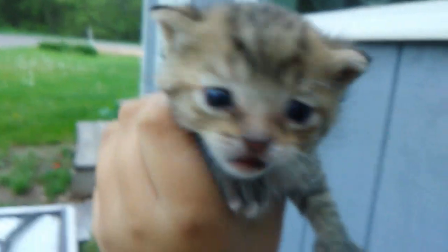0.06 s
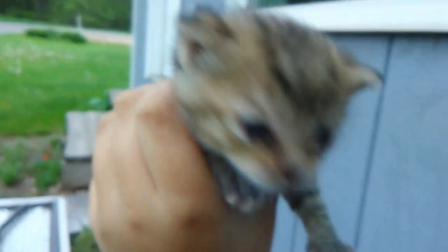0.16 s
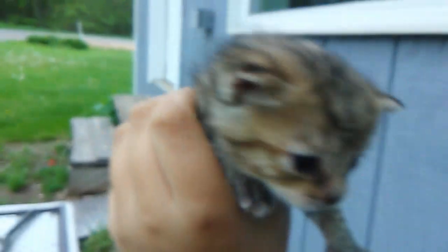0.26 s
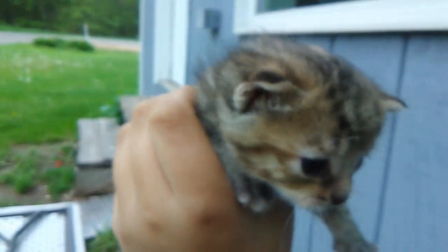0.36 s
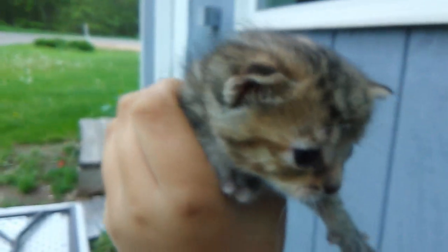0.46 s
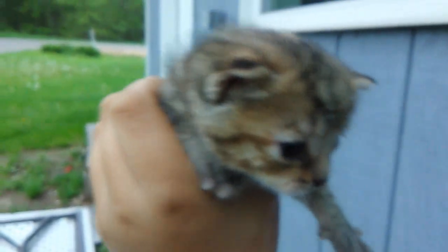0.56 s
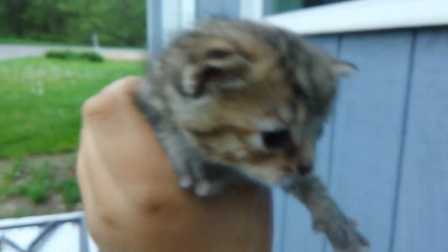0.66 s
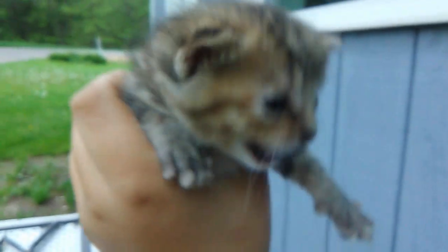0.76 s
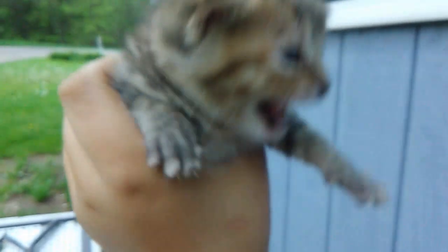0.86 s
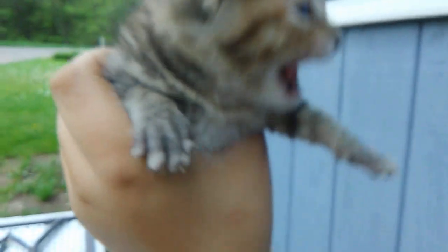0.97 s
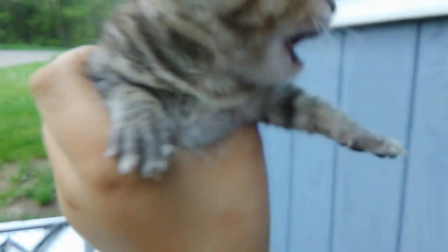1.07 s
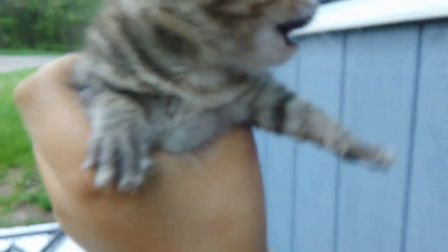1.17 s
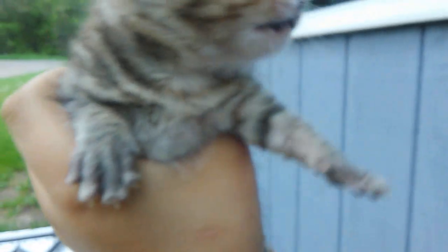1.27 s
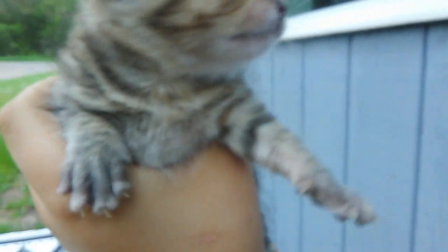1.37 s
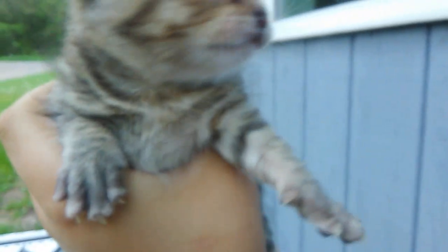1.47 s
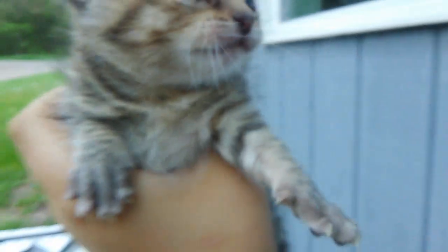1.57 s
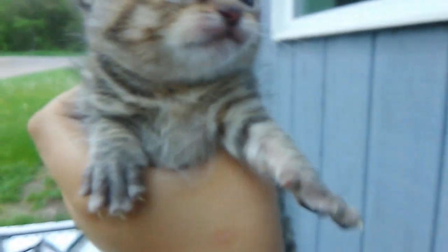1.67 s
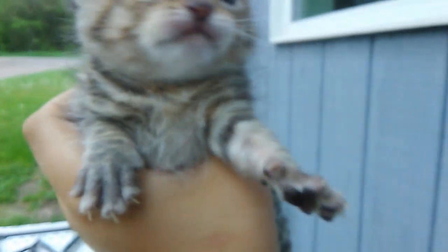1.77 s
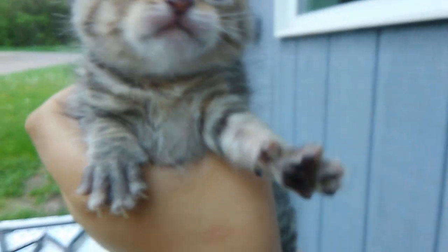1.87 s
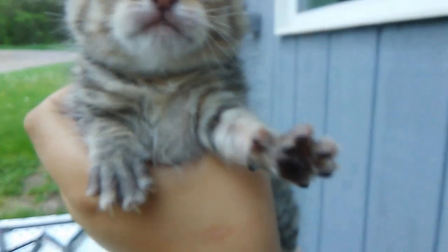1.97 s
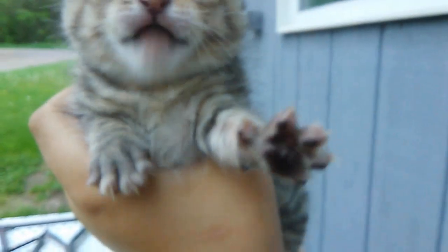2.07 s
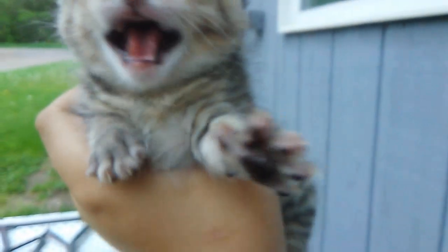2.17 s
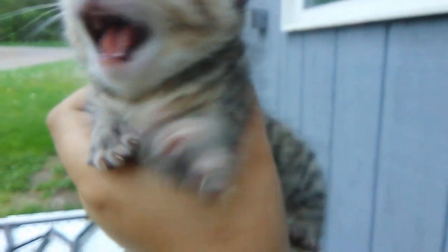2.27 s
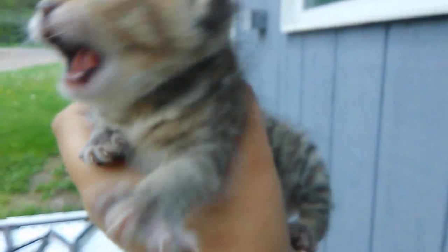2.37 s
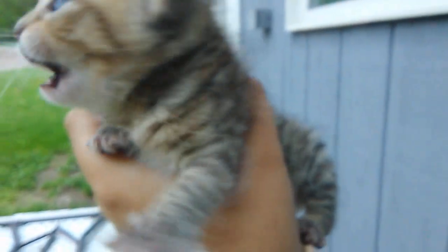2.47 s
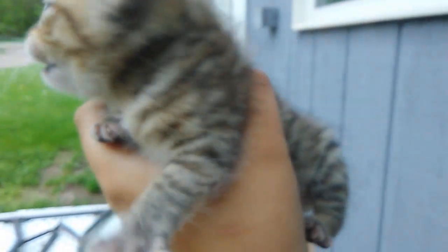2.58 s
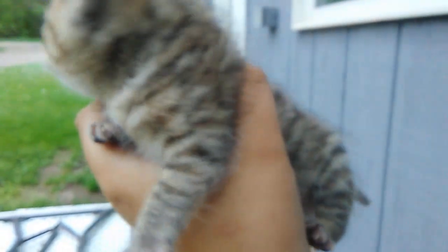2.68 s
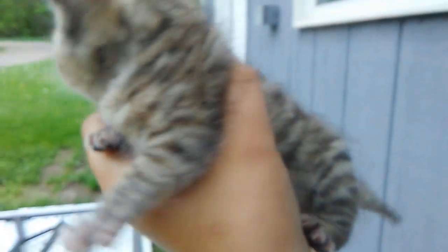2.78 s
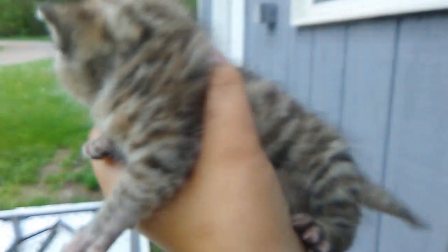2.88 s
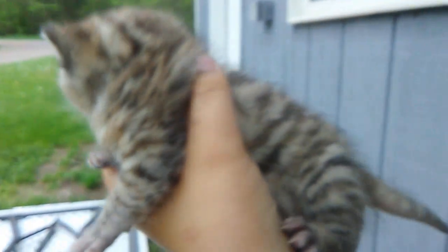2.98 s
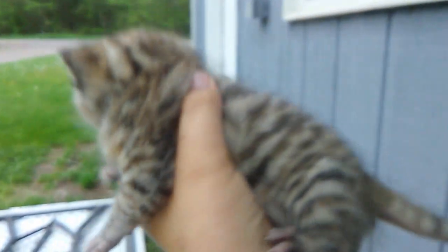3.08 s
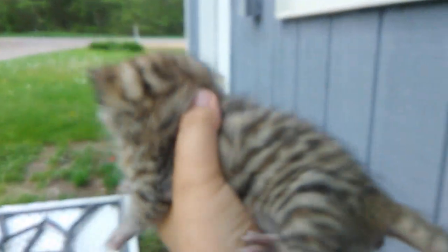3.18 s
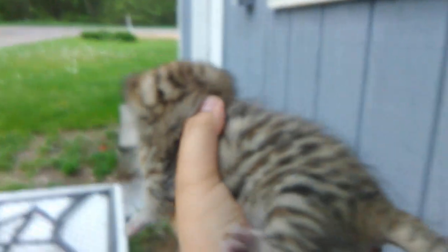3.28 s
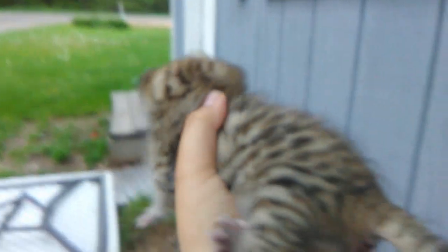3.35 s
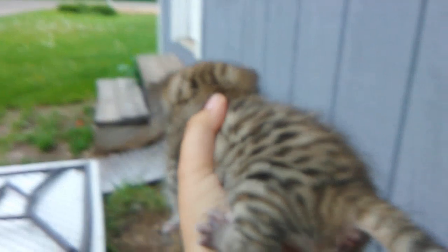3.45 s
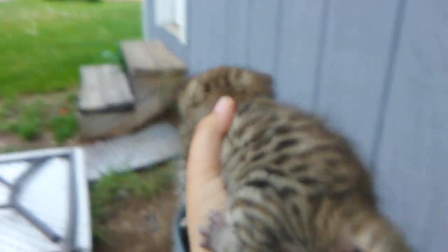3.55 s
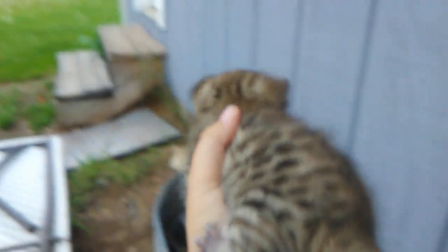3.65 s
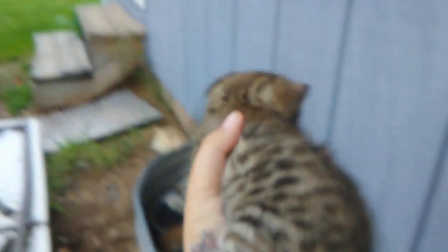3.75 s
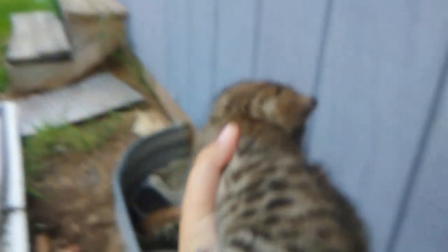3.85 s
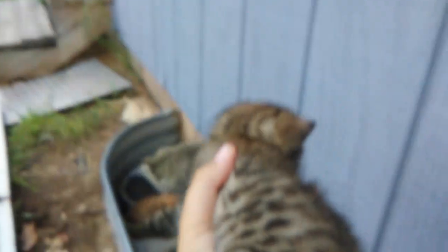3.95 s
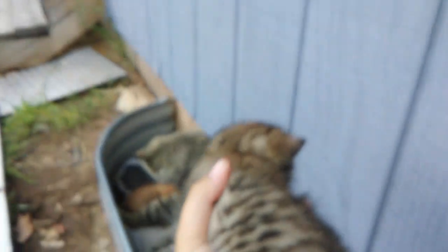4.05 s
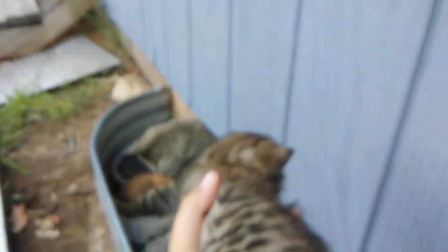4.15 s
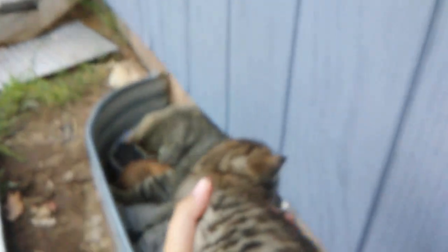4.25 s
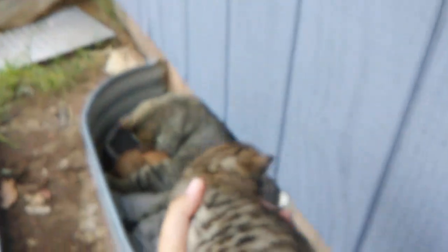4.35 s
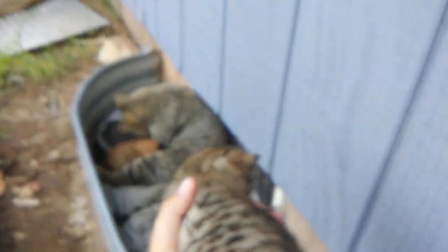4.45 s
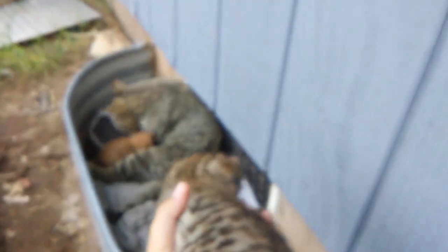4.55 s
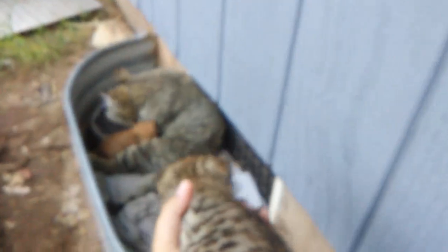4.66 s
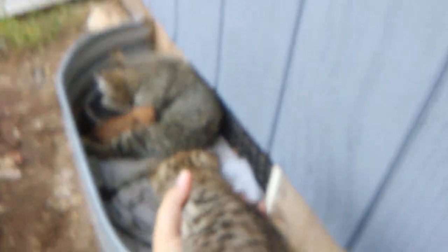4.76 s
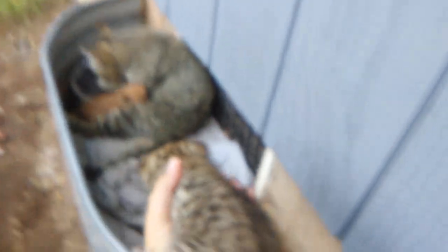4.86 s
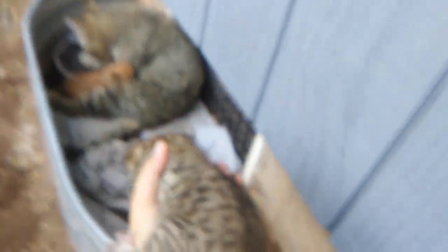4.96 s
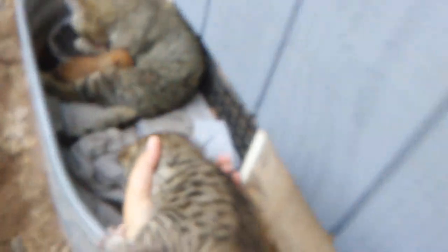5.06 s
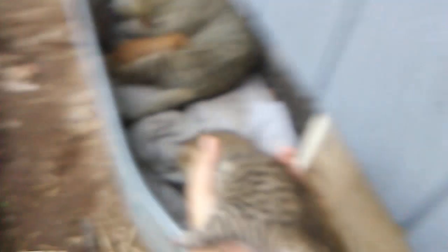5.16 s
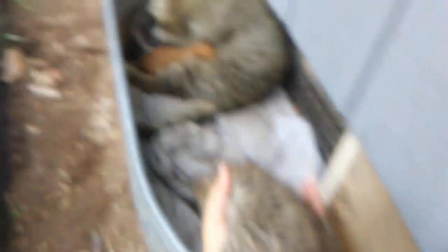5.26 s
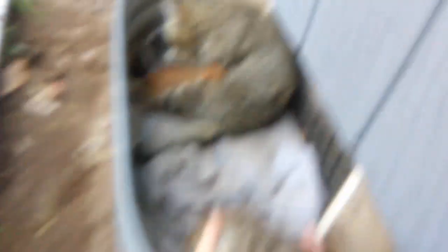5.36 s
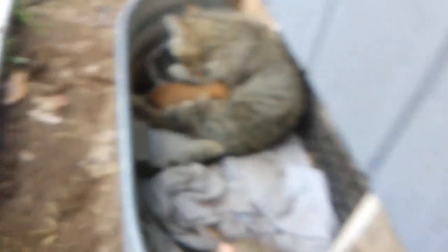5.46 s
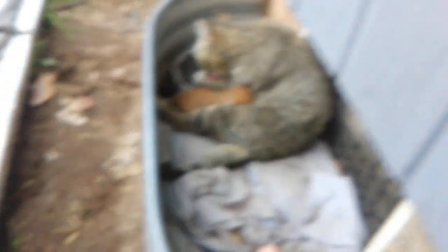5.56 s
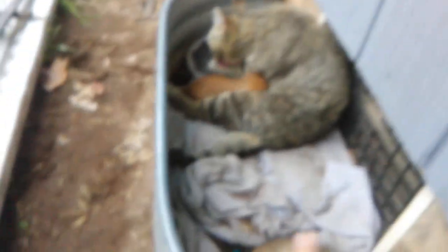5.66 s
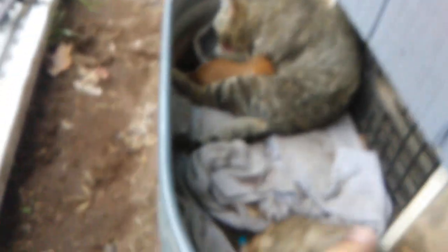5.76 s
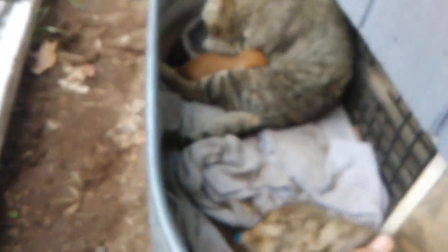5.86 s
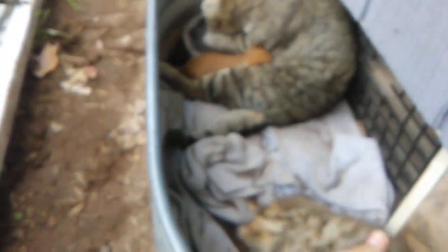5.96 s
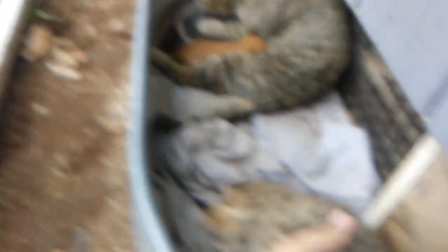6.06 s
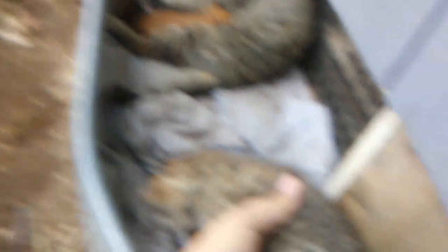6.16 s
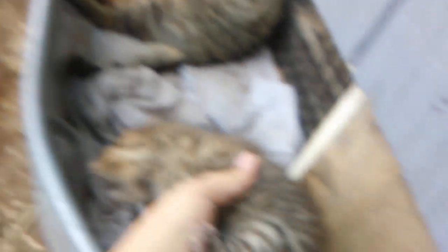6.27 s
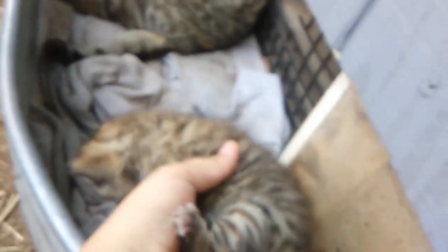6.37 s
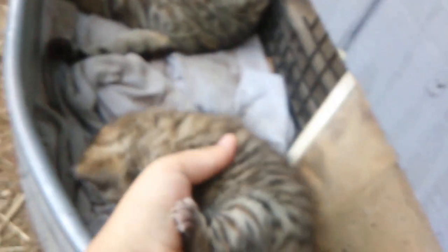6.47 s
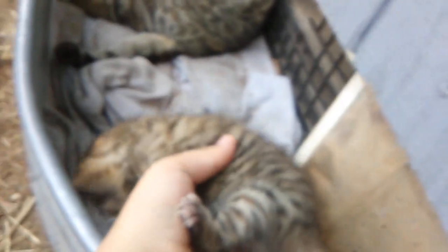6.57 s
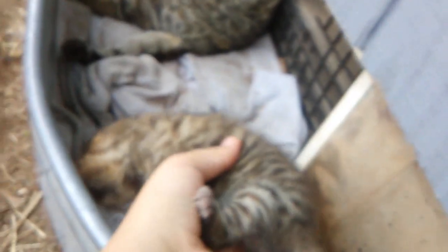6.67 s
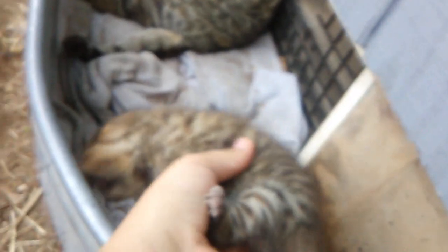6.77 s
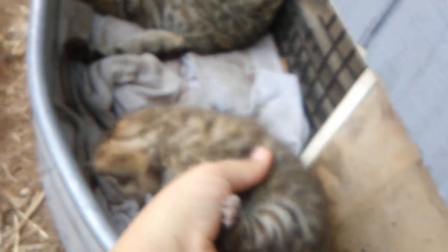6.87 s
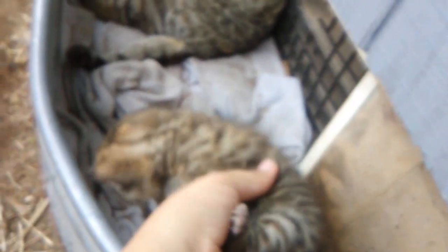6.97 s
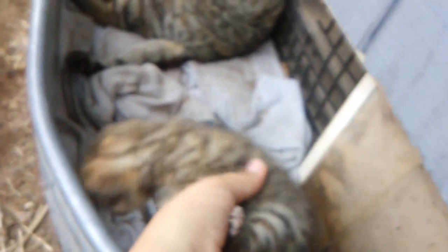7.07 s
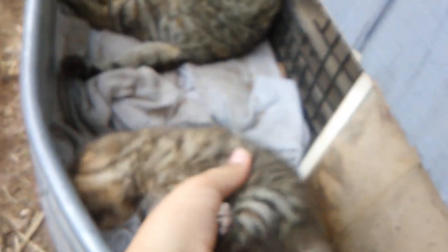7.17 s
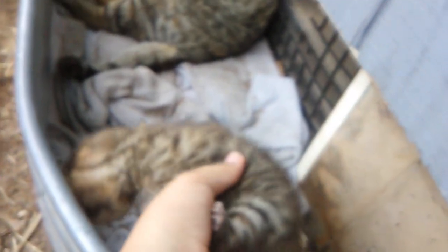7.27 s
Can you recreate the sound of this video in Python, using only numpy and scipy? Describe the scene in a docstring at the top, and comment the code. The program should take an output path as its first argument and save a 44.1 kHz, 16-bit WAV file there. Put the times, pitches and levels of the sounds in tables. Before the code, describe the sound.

A tiny kitten gives four piercing, high-pitched cries close up outdoors, then cloth rustles, a sharp snap, and a soft trill from its mother.

```python
"""Kitten, mother and yard.

A young kitten, close to the microphone beside a house wall, cries four times: vocal folds as overtones.
Handling on cloth in a tub gives rustles (clumpy noise), knocks, a snap, air puffs and low bumps.
Its mother answers with a soft trill, a low note chopped by a flutter. Birds (bending pure tones) and
far hoots (steady, slightly wavering tones) call across the yard over a faint, growing hush (noise)."""
import sys
import numpy as np
from scipy import signal
from scipy.fft import rfft, irfft, next_fast_len
from scipy.io import wavfile
from scipy.ndimage import uniform_filter1d

SR = 44100
rng = np.random.default_rng(int(sys.argv[2]) if len(sys.argv) > 2 else 0)


def store_wav(level_fs):
    """Save 16-bit WAV to argv[1]."""
    pcm = np.round(np.clip(np.atleast_2d(level_fs), -1, 1) * 32767)
    wavfile.write(sys.argv[1], SR, pcm.T.astype(np.int16))


N = 323241
TIME = np.arange(N) / SR


def amp(db):
    """Amplitude ratio of a level in dB."""
    return 10 ** (np.asarray(db) / 20)


def unit(x):
    """Scale to rms 1."""
    return x / np.sqrt(np.mean(x ** 2) + 1e-20)


def read(points, hz):
    """Spectrum table in dB, interpolated on a log-frequency axis."""
    point_hz, db = np.transpose(points)
    return np.interp(np.log(hz + 1), np.log(point_hz), db)


def follow(rows):
    """Sample times and the columns of a curve table along them."""
    s, *columns = np.transpose(rows)
    t = np.arange(s[0], s[-1], 1 / SR)
    return [t] + [np.interp(t, s, c) for c in columns]


def add(mix, s, sound):
    """Mix a sound in from s seconds, cut at the end."""
    part = mix[:, max(round(s * SR), 0):][:, :sound.shape[-1]]
    part += sound[..., :part.shape[1]]


def pan(db):
    """Left and right gains of constant power, from the L-R level difference."""
    gains = amp(np.array([db, -db]) / 2).reshape(2, -1)
    return gains / np.sqrt(np.mean(gains ** 2, 0))


def fade(t, seconds):
    """Straight fade in and out."""
    return np.clip(np.minimum(t - t[0], t[-1] - t) / seconds, 0, 1)


def swell(t, peak_s, rise_s, fall_s):
    """A smooth rise to 1 and a smooth fall."""
    return np.exp(-((t - peak_s) / np.where(t < peak_s, rise_s, fall_s)) ** 2 / 2)


def wobble(size, hz):
    """Smooth random curve, near rms 1, with rates up to about hz; repeats every 2 s."""
    f = np.fft.rfftfreq(SR * 2, 1 / SR)
    smooth = irfft(rfft(rng.standard_normal(SR * 2)) / (1 + (f / hz) ** 4))
    return np.resize(unit(smooth), size)


def noise(spectrum, likeness, grain=0.):
    """Coloured noise at two microphones; grain makes it a crowd of tiny snaps."""
    size = next_fast_len(N, True)
    snaps = amp(grain * np.minimum(rng.exponential(1, size), 6))
    z = rng.standard_normal((3, size)) * snaps
    shared = np.clip(likeness, 0, 1)
    z = np.sqrt(shared) * z[0] + np.sqrt(1 - shared) * z[1:]
    colour = amp(read(spectrum, np.fft.rfftfreq(size, 1 / SR)))
    return unit(irfft(rfft(z) * colour)[:, :N])


def echo(x, t60_s, delay_s):
    """Sparse scattered reflections, different for each ear."""
    t = np.arange(SR) / SR
    hits = rng.random((2, SR)) < 2000 / SR
    taps = rng.standard_normal((2, SR)) * hits * amp(-60 * t / t60_s) * (t > delay_s)
    return signal.fftconvolve(x, taps / np.linalg.norm(taps[0]), axes=1)[:, :N]


# Throat colour above the three lowest overtones. Each row: frequency in Hz, relative level in dB.
THROAT_COLOUR = [(3000, -2), (3900, -4), (4700, -10), (5400, -3), (6400, 2), (7800, -2.5), (8900, -10),
                 (10200, -6.5), (11700, -17.5), (13200, -9), (14400, -20)]
# Pitch unrest as a share of pitch, steady and at the onset; pitch smoothing.
JITTER, ONSET_JITTER, GLIDE_S = .0016, .008, .014
ONSET_AIR_DB, RELEASE_S = -20, .0055
# Mouth resonance on the first three overtones; the third is weak at the folds.
MOUTH_Q, THIRD_DB = 9.5, -16
# A high nasal resonance stands out while the mouth is half shut.
NASAL_HZ, NASAL_WIDTH_HZ, NASAL_LIFT_DB = 9630, 2200, 15
HALF_SHUT_HZ, HALF_SHUT_OCTAVES = 1670, .4
# The wriggling head swings the low notes between the ears.
SWAY_DB = 2.5
# High overtones flutter roughly in level and drift in phase between the ears.
SHIMMER_DB, SCATTER_RAD = 1.6, .9


def cry(rows, air, opening_s, attack_s, slack_jitter, hoarse_db, first_pan_db, second_pan_db, high_pan_db,
        lag_ms, throb_hz=140, slack_air_db=-5, ripple_db=3, rolloff_db=5):
    """Vocal folds, rough when slack or starting; the mouth weights low overtones, the throat high ones."""
    t, hz, effort_db, mouth_hz, treble_db = follow(rows)
    n = len(t)
    hz = uniform_filter1d(hz, int(GLIDE_S * SR), mode="nearest")

    opening = 1 / (1 + np.exp((t - opening_s) / .015))  # near 1 until the mouth is wide open
    slack = np.clip((1020 - hz) / 350, 0, 1)
    release = np.exp((t - t[-1]) / .03)  # the folds lose their grip in the last moments
    # the folds shudder as they start
    throb = np.sin(2 * np.pi * np.cumsum(throb_hz * (1 + .25 * wobble(n, 60))) / SR)
    onset_unrest = ONSET_JITTER * opening * (throb + wobble(n, 170))
    slack_unrest = slack_jitter * np.maximum(slack, .5 * release) * wobble(n, 540)

    k = np.arange(1, 15)[:, None]  # overtone numbers
    mouth_ratio = k[:3] * hz / mouth_hz
    hz = hz * (1 + JITTER * wobble(n, 96) + onset_unrest + slack_unrest)
    phase = 2 * np.pi * np.cumsum(hz) / SR
    overtone_hz = k * hz

    half_shut = np.exp(-(np.log2(mouth_hz / HALF_SHUT_HZ) / HALF_SHUT_OCTAVES) ** 2)
    nasal = np.exp(-((overtone_hz - NASAL_HZ) / NASAL_WIDTH_HZ) ** 2)
    colour_db = read(THROAT_COLOUR, overtone_hz) + NASAL_LIFT_DB * half_shut * nasal
    colour_db = colour_db - rolloff_db * np.maximum(k - 10, 0)
    ripple = np.array([wobble(n, 7) for _ in k])  # the turning head ripples each high overtone
    weight = amp(colour_db + ripple_db * ripple) * (k > 3)
    gain = amp(treble_db) * weight / np.sqrt((weight ** 2).sum(0) + 1e-3)
    low_drive = amp(effort_db + THIRD_DB * (k[:3] == 3))
    gain[:3] = low_drive / np.hypot(1 - mouth_ratio ** 2, mouth_ratio / MOUTH_Q)
    gain[2:] *= 1 + .2 * opening * throb

    out = np.zeros((2, n))
    ears = np.array([phase - 2 * np.pi * hz * lag_ms / 1000, phase])  # low notes reach the left port later
    low_sides = [pan(db + SWAY_DB * wobble(n, 5.7)) for db in (first_pan_db, second_pan_db)]
    high_sides = pan(high_pan_db)
    for i, g in enumerate(gain[:2]):
        out += np.sqrt(2) * g * np.cos((i + 1) * ears - i * i / 2) * low_sides[i]
    for i, g in enumerate(gain[2:], 2):
        drift = np.array([[.5], [-.5]]) * SCATTER_RAD * wobble(n, 6)
        shimmer = amp(SHIMMER_DB * wobble(n, 70))
        out += np.sqrt(2) * g * shimmer * np.cos((i + 1) * phase - i * i / 2 + drift) * high_sides

    # slack folds alternate strong and weak cycles, adding a note between the first two
    between = np.cos(ears + ears / 2) * low_sides[1]
    out += amp(-5.0) * gain[1] * np.maximum(slack, release) * between
    # air escapes in a puff each cycle
    leak = amp(hoarse_db) + amp(ONSET_AIR_DB) * opening + amp(slack_air_db) * np.maximum(slack, release)
    out += air[:, :n] * leak * amp(treble_db) * (1 + 0.44 * np.cos(phase)) * high_sides
    attack = np.minimum((t - t[0]) / attack_s, 1)
    return t[0], out * attack * np.minimum((t[-1] - t) / RELEASE_S, 1)


# Gesture of each cry. Each row: time in seconds, pitch in Hz, effort (low-note drive) in dB,
# mouth resonance in Hz, treble level in dB.
GESTURE_1 = [(0.0, 1218, -47, 2250.0, -40), (0.039, 1320, -48, 2330, -39),
             (0.131, 1194, -48.5, 2286, -41.5), (0.182, 1153, -46, 1460, -43.5),
             (0.245, 887, -53.5, 2700, -46.5), (0.277, 830, -55, 970, -47), (0.299, 750, -123, 1210, -58)]
GESTURE_2 = [(0.877, 613, -57, 2570, -53.5), (0.921, 1016, -45.5, 2990.0, -35.5),
             (0.956, 1146, -42, 3450.0, -36), (1.006, 1204, -44.5, 3560, -36),
             (1.057, 1296, -41.5, 2520, -34.5), (1.14, 1327, -42.5, 2170, -40),
             (1.278, 1264, -42, 1940, -39.9), (1.402, 1195, -48.5, 1240, -41),
             (1.464, 1027, -41.5, 1220, -55), (1.491, 1120, -47, 1230, -62), (1.51, 930, -95, 1120, -53)]
GESTURE_3 = [(2.156, 525, -47, 2480, -49), (2.199, 757, -47.5, 3100, -54),
             (2.229, 1018, -38.5, 3840, -34.5), (2.287, 1318, -46.5, 3660, -27.5),
             (2.341, 1298, -42, 3600, -29.5), (2.366, 1277, -44.5, 3100, -30),
             (2.401, 1338, -44.5, 2620, -32.5), (2.442, 1319, -42.5, 2270, -32),
             (2.506, 1291, -42.5, 2110, -34), (2.564, 1313, -42, 1907, -35),
             (2.677, 1293, -40, 1664, -40.5), (2.754, 1214, -39.5, 1290, -56.5),
             (2.8, 1077, -48.5, 1290, -59.5), (2.844, 867, -52.5, 1125, -82), (2.874, 816, -67, 1163, -84)]
GESTURE_4 = [(4.096, 593, -57, 2300, -72), (4.162, 905, -60.5, 2230, -65), (4.21, 1253, -43.5, 2850, -39.5),
             (4.279, 1422, -65, 2920, -43.5), (4.352, 1360, -54.5, 2960, -46.5),
             (4.411, 1377, -56.5, 2190, -52), (4.465, 1424, -48, 1970, -44), (4.62, 1280, -52.5, 1400, -69),
             (4.665, 1168, -45, 1242, -65), (4.689, 948, -53, 1350, -73), (4.736, 952, -72, 1280, -76)]
# Voice of each cry. Each row: time the mouth is wide open in seconds, attack in seconds,
# pitch unrest of slack folds as a share, hoarseness (air relative to treble) in dB,
# L-R of fundamental in dB, of octave in dB, of treble in dB, delay of low notes at the left port in ms.
CRY_VOICES = [(-.1, 0.00062, 0.11, -18, -1, -4.5, -4.5, 0.3),
              (1.001, 0.012, 0.13, -21.5, -1, 4.5, -2, 0.28),
              (2.32, 0.012, 0.15, -28.5, -6.5, -8, -9, 0.43), (4.26, 0.033, 0.057, -23, -9, 5, 0, 0.49)]
WALL_DB = -19


def kitten():
    """Four cries, thrown back faintly by the wall and the yard."""
    out = np.zeros((2, N))
    # breath colour: Hz, relative dB
    air = noise([(300, -37.5), (1200, -14.5), (2400, 8.5), (3100, -7), (4200, -19.5), (6500, 1.5),
                 (9500, -3.5), (12000, -6.5), (14000, -2.5)], 0.75)
    gestures = (GESTURE_1, GESTURE_2, GESTURE_3, GESTURE_4)
    for i, (gesture, voice) in enumerate(zip(gestures, CRY_VOICES)):
        add(out, *cry(gesture, air[:, i * SR:], *voice))
    wall = amp(WALL_DB) * echo(out, .04, .003)
    beamed = signal.lfilter([1, -.85], 1, out)  # the open mouth throws mostly treble into the yard
    return amp(-0.1) * out + wall + amp(-12.5) * echo(beamed, 0.5, .014)


# Outdoor hush colour. Each row: frequency in Hz, relative level in dB per Hz.
HUSH_COLOUR = [(12, -53.5), (20, -32), (46, -4.5), (79, 1), (244, -14.5), (379, -19), (447, -18.5),
               (714, -19), (889, -20.5), (1340, -23), (1580, -21.5), (5310, -33), (6810, -28), (8960, -32),
               (14300, -39)]
HUSH_START_DB, HUSH_GROWTH_DB = -71, 9


def hush():
    """Distant outdoor air: coloured noise growing over the whole scene, slightly faster at first."""
    swell_db = 1.2 * wobble(N, 6)
    growth_db = HUSH_GROWTH_DB * (TIME / TIME[-1]) ** 0.84
    return noise(HUSH_COLOUR, 0.52) * amp(HUSH_START_DB + growth_db + swell_db)


# Knocks and ticks of handling. Each row: start in seconds, level in dB, L-R in dB, decay time in ms,
# added brightness in dB per octave (400 to 8000 Hz), tail relative to crack in dB.
KNOCK_ROWS = [(.376, -44, 2, 0.99, 20, -21), (0.388, -50.5, 19, 6.8, 18, -23),
              (0.7196, -63, 18, 4.7, 74, -3.5), (1.736, -53.5, 10, 1.7, -4, -32),
              (3.164, -52.5, -8, 1.42, 28, -58), (4.078, -51, 23, 2.8, 25, 4),
              (5.207, -21.5, 30, 0.62, 3.5, -18), (5.5626, -33, 30, 7.2, 0.5, -23),
              (6.658, -34, 10.5, 1.33, 3, -22)]


def knocks(tail_s=0.053):
    """Short cracks of coloured noise with a scuffing tail, both decaying exponentially."""
    out, t = np.zeros((2, N)), np.arange(8192) / SR
    hz = np.fft.rfftfreq(len(t), 1 / SR)
    # common colour: Hz, relative dB
    base_db = read([(100, 2.5), (1200, -7.5), (3000, -6.5), (7000, -16.5), (14000, -35.0)], hz)
    octaves = np.log2(np.clip(hz, 400, 8000) / 4000)
    for s, db, side_db, decay_ms, bright, tail_db in KNOCK_ROWS:
        colour = amp(bright * octaves + base_db)
        grit = unit(irfft(rfft(rng.standard_normal((2, len(t)))) * colour))
        decay = np.exp(-1000 * t / decay_ms) + amp(tail_db) * np.exp(-t / tail_s)
        add(out, s, grit * amp(db) * pan(side_db) * decay)
    return out


# Air puffs on the microphone. Each row: peak in seconds, level in dB, Gaussian half-length in seconds.
PUFF_ROWS = [(0.926, -43, 0.004), (1.012, -43, 0.0082), (1.022, -34.5, 0.0062), (1.03, -30.5, 0.0029),
             (1.038, -44, 0.0089), (1.065, -36.5, 0.0063), (1.096, -48, 0.014)]
# Puff colour. Each row: frequency in Hz, relative level in dB.
PUFF_COLOUR = [(80, -29.5), (300, -5.5), (800, -10), (1700, 1.5), (2300, -5.5), (4000, -29), (9000, -47.5)]
# Dull bumps and rubs of the hand. Each row: peak in seconds, level in dB, L-R in dB, pitch in Hz,
# Gaussian half-length in seconds.
BUMP_ROWS = [(1.957, -70.5, 6, 431, 0.047), (2.105, -41.5, 32, 87.6, 0.005), (2.176, -49, 16, 65, 0.027),
             (2.557, -60, 3, 276, 0.013), (2.577, -53, 20, 72, 0.021), (2.756, -48, -32, 73.7, 0.01),
             (2.792, -41.5, -18, 68.3, 0.0075), (2.934, -52, -62, 55, 0.011),
             (3.294, -64.5, 4.5, 366.5, 0.019), (3.436, -67, 2.5, 297.3, 0.092),
             (3.764, -61.5, -15, 580, 0.0098), (3.921, -70.5, 4, 391, 0.25), (4.592, -51.5, -3, 66, 0.0092),
             (5.088, -55, 2, 383.4, 0.033), (5.587, -38.5, 28, 73.6, 0.0046), (6.069, -53, 1.5, 295, 0.013),
             (7.049, -52, -2, 74, 0.0068), (7.131, -58, -4, 77, 0.023), (7.154, -61.5, 2, 264, 0.012)]


def buffets():
    """Air puffs on the ports (noise bursts) and low bumps through the microphone body (brief tones)."""
    level = sum(amp(db) * np.exp(-((TIME - s) / length_s) ** 2 / 2) for s, db, length_s in PUFF_ROWS)
    out = noise(PUFF_COLOUR, 0.67) * level * pan(0.77)
    t = np.arange(-4000, 4000) / SR
    for s, db, side_db, hz, length_s in BUMP_ROWS:
        swing = np.cos(2 * np.pi * hz * t + hz / 260 * wobble(len(t), 67))
        bump = np.sqrt(2) * swing * np.exp(-(t / length_s) ** 2 / 2)
        add(out, s + t[0], amp(db) * pan(side_db) * bump)
    return out


def whistle(s, length_s, start_hz, middle_hz, end_hz, db, waver):
    """One wavering pure tone that swells and fades while its pitch passes through three points."""
    u = np.linspace(0, 1, int(length_s * SR))
    hz = np.polyval(np.polyfit([0, .5, 1], [start_hz, middle_hz, end_hz], 2), u)
    phase = 2 * np.pi * np.cumsum(hz * (1 + waver * wobble(len(u), 150))) / SR
    return s, np.sqrt(2) * amp(db) * np.sin(phase) * np.sqrt(abs(np.sin(np.pi * u)))


# A songbird's run of notes, each a falling slur and a low tag.
# Each row: start in seconds, top pitch in Hz, relative level in dB.
SONG_NOTES = [(3.03, 6920, -65), (3.195, 7140, -49), (3.374, 7190, -41.5), (3.541, 7360, -41)]
SLUR_S, SLUR_FALL_HZ = 0.11, 1350
TAG_AFTER_S, TAG_S, TAG_HZ, TAG_DB = 0.11, 0.0405, (5260, 5380, 5000), -8.5
# Single bird notes. Each row: start in seconds, length in seconds, start pitch in Hz, middle pitch in Hz,
# end pitch in Hz, relative level in dB, waver as a share of pitch.
CHIRP_NOTES = [(3.712, 0.06, 7600, 7390, 7280, -45.5, 0.013), (3.756, 0.032, 7400, 7450, 7320, -35, 0.0072),
               (3.844, 0.071, 4100, 5450, 4720, -45, 0.0204), (4.089, 0.18, 2436, 2247, 2430, -51, 0.0046),
               (5.887, 0.049, 2325, 2290, 2200, -51.5, 0.019),
               (5.995, 0.0393, 2240, 2500, 2440, -49.5, 0.052)]
# Faint far hoots. Each row: start in seconds, length in seconds, pitch in Hz, relative level in dB.
HOOT_NOTES = [(1.045, 0.091, 280, -55), (1.349, 0.091, 279.5, -53.5), (1.47, 0.1, 276.7, -52.5),
              (1.588, 0.055, 272.6, -55.5), (1.7, 0.11, 275.4, -71)]


def yard(song_waver=0.0042):
    """Birds' bending whistles and far hoots of steady pitch with a waver, scattered by trees and walls."""
    birds, far = np.zeros((2, N)), np.zeros((2, N))
    for s, top_hz, db in SONG_NOTES:
        middle_hz, end_hz = top_hz - 0.46 * SLUR_FALL_HZ, top_hz - SLUR_FALL_HZ
        add(birds, *whistle(s, SLUR_S, top_hz, middle_hz, end_hz, db, song_waver))
        add(birds, *whistle(s + TAG_AFTER_S, TAG_S, *TAG_HZ, db + TAG_DB, song_waver))
    for row in CHIRP_NOTES:
        add(birds, *whistle(*row))
    for s, length_s, hz, db in HOOT_NOTES:
        add(far, *whistle(s, length_s, hz, hz, hz, db, .035))
    near_mix = amp(-5.0) * birds + amp(-3.5) * echo(birds, 0.46, 0.0038)
    return near_mix + amp(-2) * far + amp(-9.5) * echo(far, 0.35, 0.011)


# Strokes of fur and cloth. Each row: peak in seconds, rise in seconds, fall in seconds,
# hiss level in dB, body level in dB, L-R in dB.
STROKE_ROWS = [(2.07, 0.054, 0.066, -63.5, -73.5, 10), (2.56, 0.045, 0.11, -50.5, -57.5, 0),
               (2.83, 0.12, 0.1, -66.5, -62.5, 7), (3.48, 0.23, 0.52, -55.5, -114, 2),
               (3.77, 0.045, 0.035, -53.5, -61, 11.5), (3.93, 0.071, 0.069, -48.5, -70.5, 9),
               (4.1, 0.0048, 0.12, -60, -55, 0), (4.3, 0.15, 0.072, -52, -62.5, 7),
               (4.52, 0.093, 0.16, -54, -60, 3), (4.72, 0.088, 0.035, -74, -59.5, 4),
               (4.88, 0.08, 0.065, -56.5, -58, 3), (5.071, 0.037, 0.075, -43.5, -49, 0.5),
               (5.129, 0.022, 0.02, -49, -49, 1), (5.22, 0.029, 0.06, -43, -58, 12),
               (5.41, 0.15, 0.075, -38.5, -58.5, 6), (5.564, 0.011, 0.03, -42, -50.5, 32),
               (5.6, 0.15, 0.083, -54, -63, 18), (5.9, 0.11, 0.087, -60, -62.5, 8.5),
               (6.169, .008, 0.022, -61.5, -60.5, 16), (6.7, 1, 0.56, -86, -74.5, 7),
               (7.14, 0.025, 0.1, -68, -66.5, 12)]
# Fine hiss colour. Each row: frequency in Hz, relative level in dB per Hz.
HISS_COLOUR = [(2000, -38), (3000, -18.5), (4500, -17), (5400, -5.5), (7100, 2), (9000, -6), (10500, -16.5),
               (13000, -14.5), (14300, -12)]
# Duller scrape colour. Each row: frequency in Hz, relative level in dB.
BODY_COLOUR = [(120, -50), (200, -37), (284, -50.5), (372, 0), (812, -12.5), (1230, 1.5), (2650, 2.5),
               (3080, 0.5), (3980, 0.5), (5000, 1), (6500, 7), (11000, -120)]


def rustle():
    """Fibres slipping in strokes: a fine hiss over a duller scrape, both in uneven clumps."""
    hiss, body = noise(HISS_COLOUR, 0.37, grain=2.45), noise(BODY_COLOUR, 0.06, grain=1.2)
    hiss_power, body_power = np.zeros((2, N)), np.zeros((2, N))
    for s, rise_s, fall_s, hiss_db, body_db, side_db in STROKE_ROWS:
        t = np.arange(s - 4 * rise_s, s + 4 * fall_s, 1 / SR)
        stroke = swell(t, s, rise_s, fall_s) * pan(side_db)
        add(hiss_power, t[0], (amp(hiss_db) * stroke) ** 2)
        add(body_power, t[0], (amp(body_db) * stroke) ** 2)
    strokes = hiss * np.sqrt(hiss_power) + body * np.sqrt(body_power)
    return strokes * amp(0.97 * wobble(N, 42))


def snap(s=5.2056, db=-7.5, side_db=12, width_s=.00006, rebound=.7):
    """One hard flick against the microphone body: a single sharp pressure pulse."""
    u = np.arange(256) / SR / width_s
    out = np.zeros((2, N))
    add(out, s, -amp(db) * pan(side_db) * (1 - rebound * u) * np.exp(-u))
    return out


# The mother's trill. Each row: time in seconds, pitch in Hz.
TRILL_PITCH = [(6.62, 666), (6.675, 483), (6.71, 512), (6.96, 512.6), (7.07, 573)]
TRILL_DB, TRILL_PEAK_S, TRILL_RISE_S, TRILL_FALL_S = -49.5, 6.76, 0.081, 0.14
TRILL_FLUTTER, TRILL_OVERTONE_DB, TRILL_BRIGHTEN_DB = .8, -2.5, 13


def mother(flutter_hz=38, swing=0.055, lag_s=0.0002):
    """Closed-mouth trill: a low note chopped by a fast flutter, brightening and ringing in the tub."""
    t, hz = follow(TRILL_PITCH)
    n = len(t)
    age = t - t[0]
    depth = TRILL_FLUTTER * np.sin(np.pi * age / age[-1]) ** 2
    beat = 2 * np.pi * np.cumsum(flutter_hz * (1 + .1 * wobble(n, 20))) / SR
    unrest = .04 * wobble(n, 200)
    phase = 2 * np.pi * np.cumsum(hz * (1 - swing * depth * np.sin(beat) + unrest)) / SR
    phase = np.array([phase - 2 * np.pi * hz * lag_s, phase])  # later at the left port
    overtones = np.sin(2 * phase) + amp(-8) * np.sin(3 * phase) + amp(-17.5) * np.sin(4 * phase)
    overtone_db = TRILL_OVERTONE_DB + TRILL_BRIGHTEN_DB * (age / age[-1]) ** 4
    voice = np.sin(phase) + amp(overtone_db) * overtones
    voice = voice * (1 + depth * np.cos(beat)) * amp(2.5 * wobble(n, 46))
    envelope = swell(t, TRILL_PEAK_S, TRILL_RISE_S, TRILL_FALL_S) * fade(t, 0.0067)
    out = np.zeros((2, N))
    add(out, t[0], amp(TRILL_DB) * voice * envelope)
    return out + amp(-11) * echo(out, .12, .002)


def scene():
    """All sources summed."""
    return kitten() + mother() + yard() + knocks() + snap() + buffets() + rustle() + hush()


EDGE_HZ = 14400


def record(dry):
    """The recorder's band limit: a steep low-pass."""
    low_pass = signal.firwin(511, EDGE_HZ, window=("kaiser", 9), fs=SR)
    return signal.oaconvolve(dry, low_pass[None], "same")


dry = scene()
out = record(dry)
store_wav(out)
```